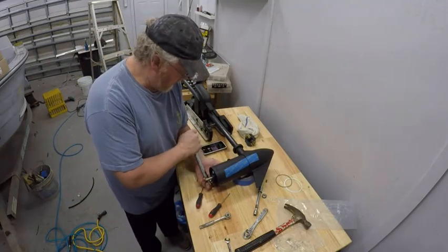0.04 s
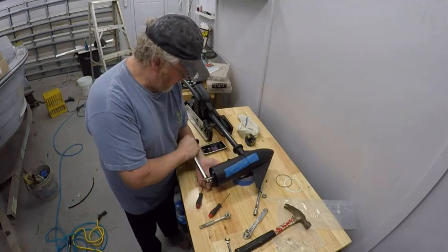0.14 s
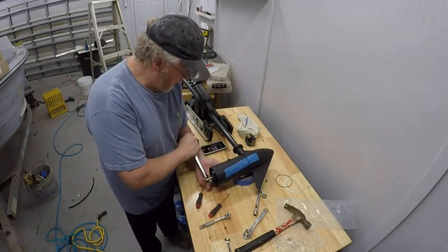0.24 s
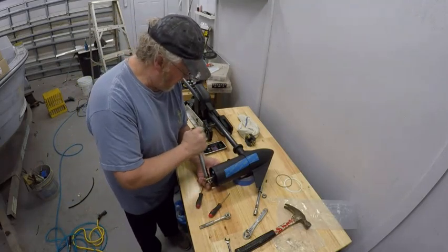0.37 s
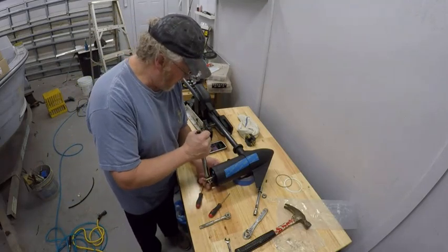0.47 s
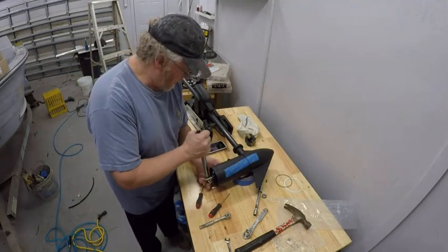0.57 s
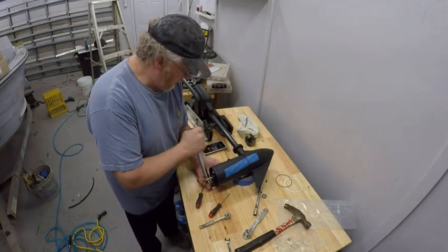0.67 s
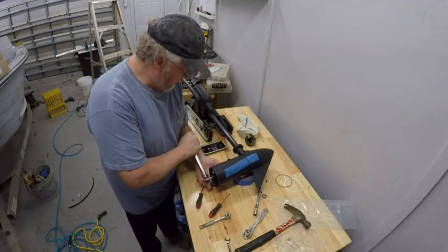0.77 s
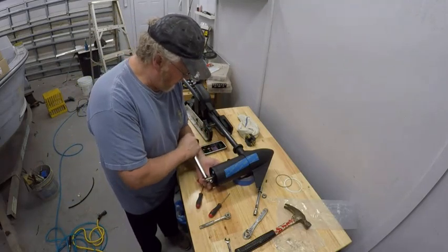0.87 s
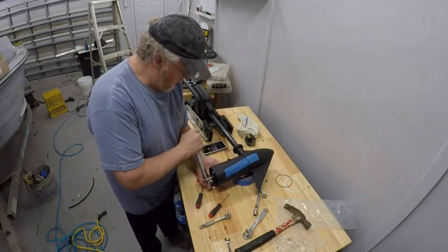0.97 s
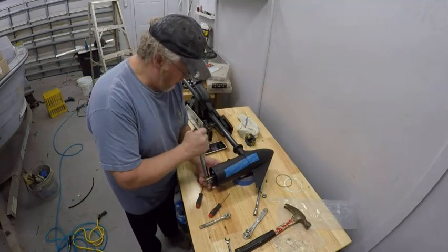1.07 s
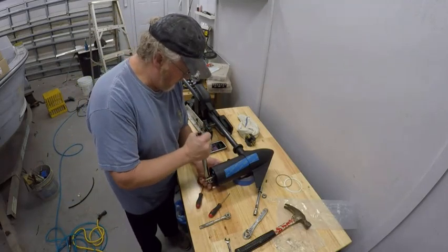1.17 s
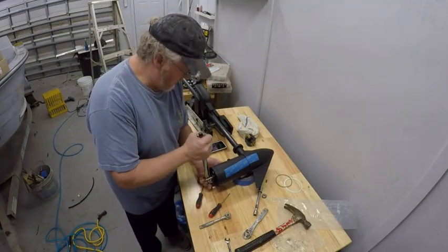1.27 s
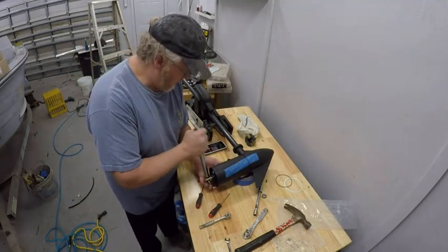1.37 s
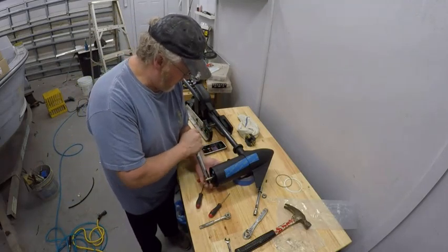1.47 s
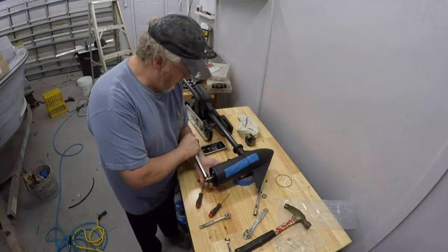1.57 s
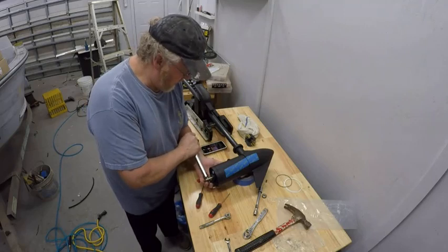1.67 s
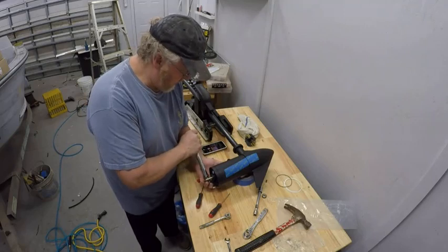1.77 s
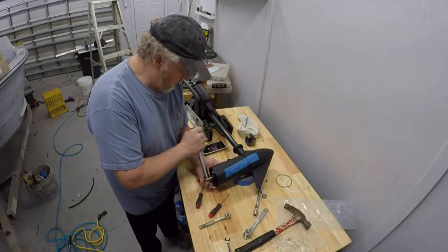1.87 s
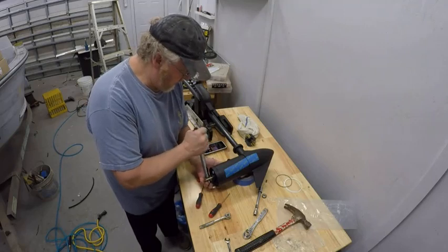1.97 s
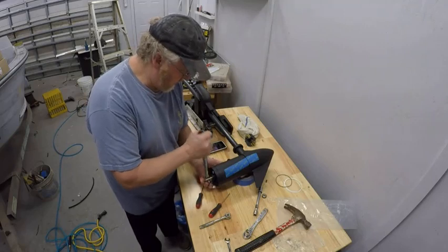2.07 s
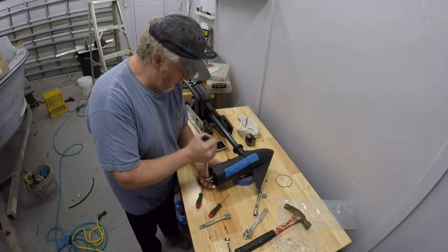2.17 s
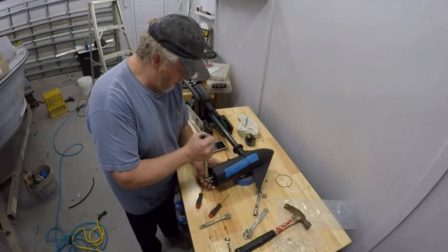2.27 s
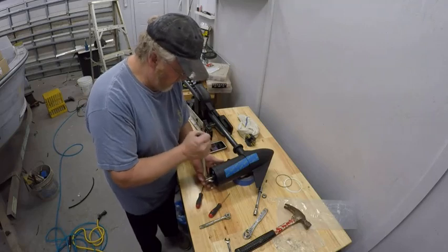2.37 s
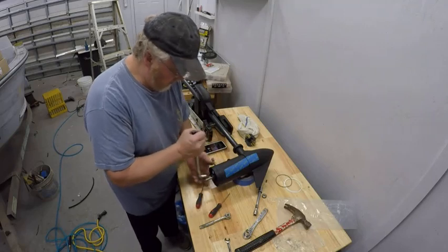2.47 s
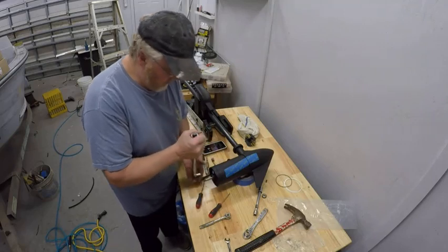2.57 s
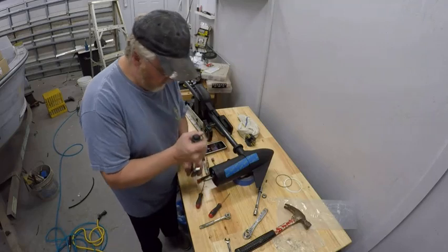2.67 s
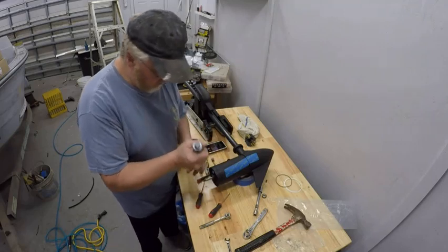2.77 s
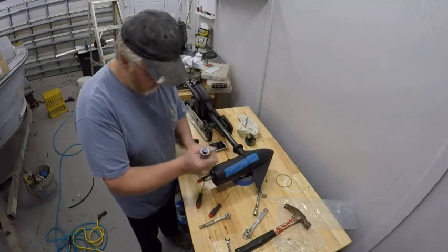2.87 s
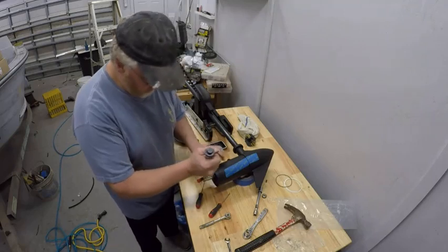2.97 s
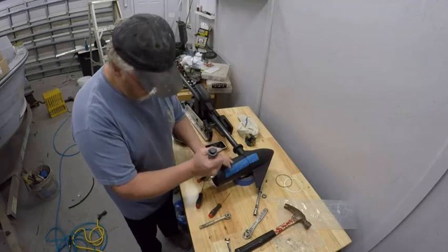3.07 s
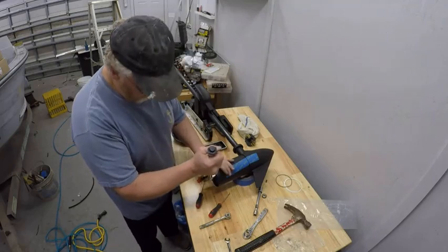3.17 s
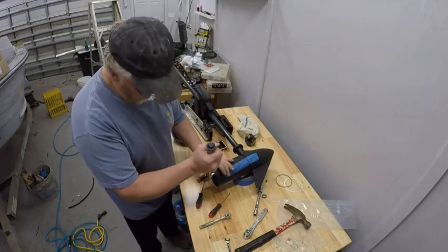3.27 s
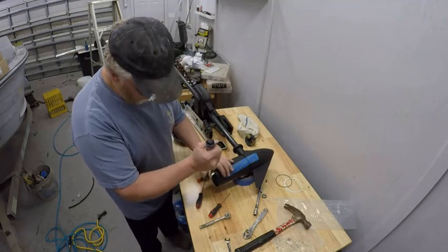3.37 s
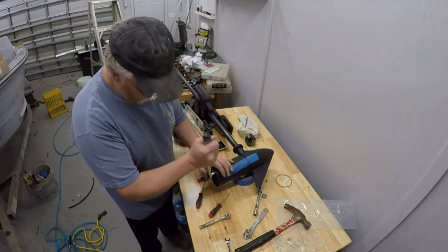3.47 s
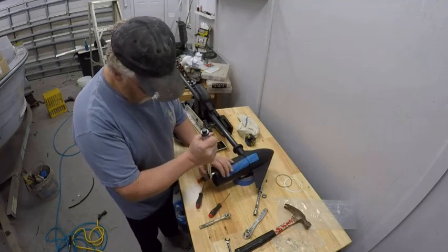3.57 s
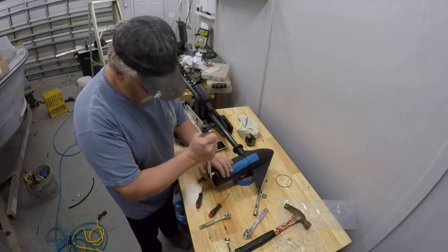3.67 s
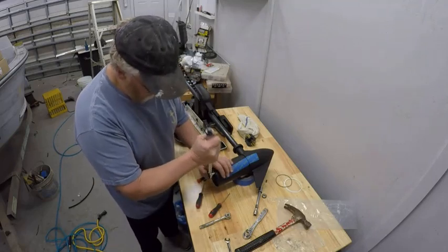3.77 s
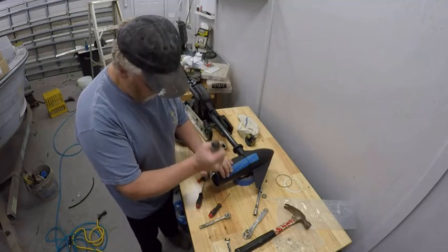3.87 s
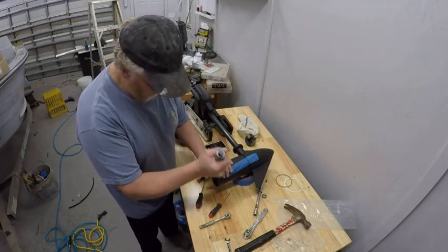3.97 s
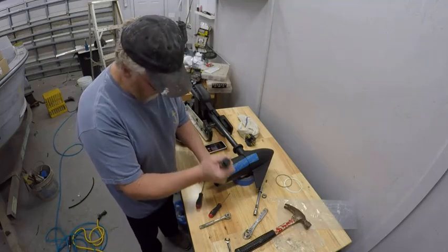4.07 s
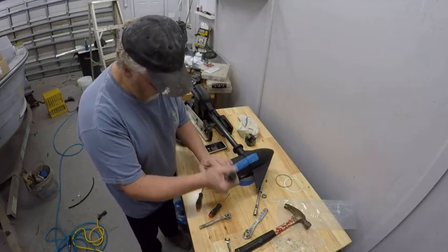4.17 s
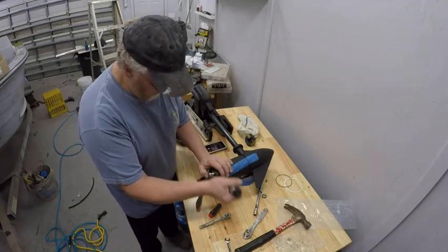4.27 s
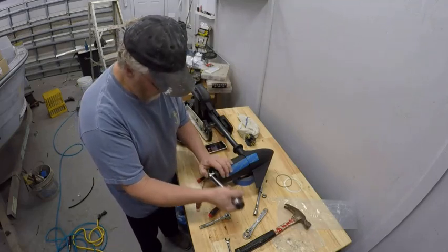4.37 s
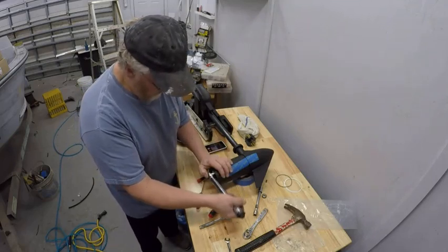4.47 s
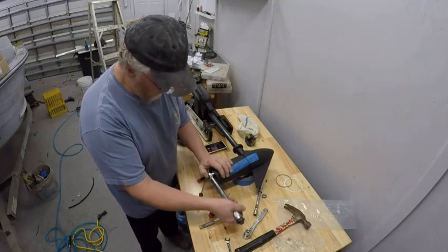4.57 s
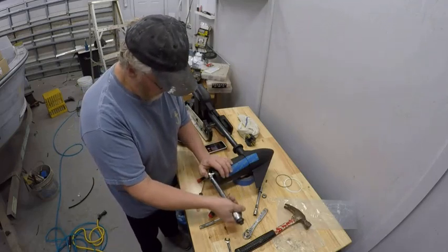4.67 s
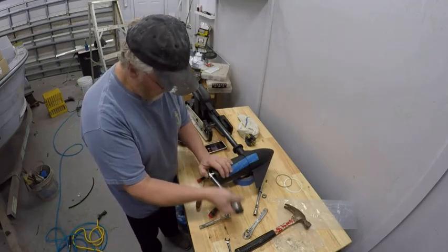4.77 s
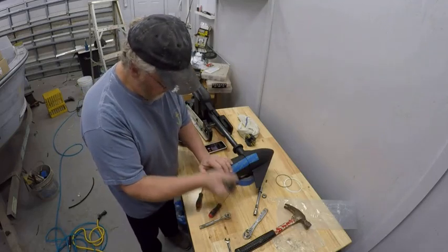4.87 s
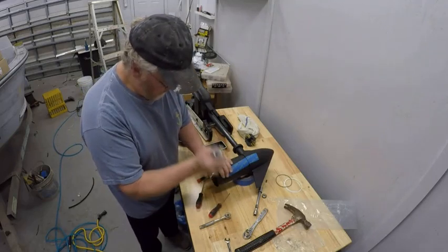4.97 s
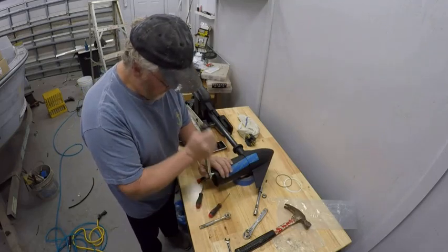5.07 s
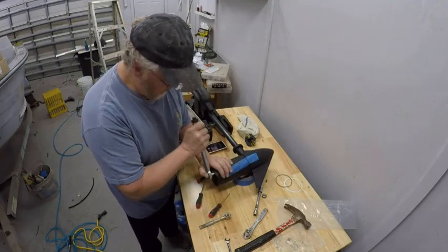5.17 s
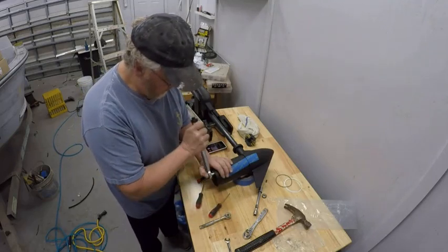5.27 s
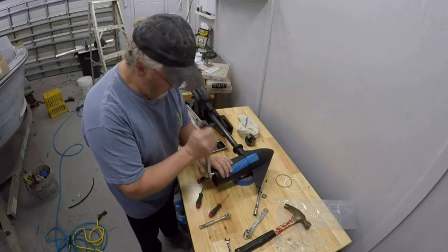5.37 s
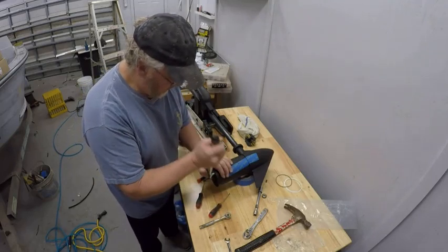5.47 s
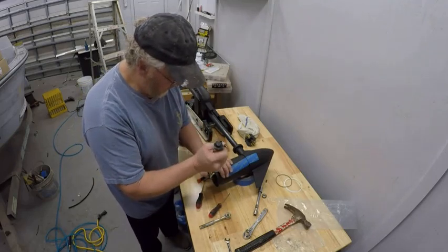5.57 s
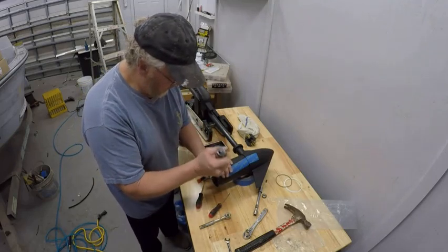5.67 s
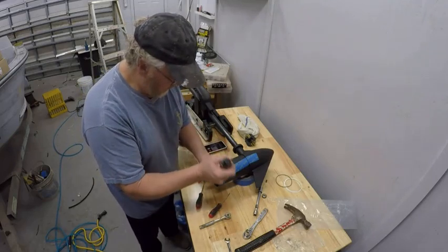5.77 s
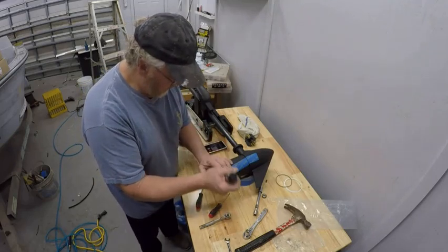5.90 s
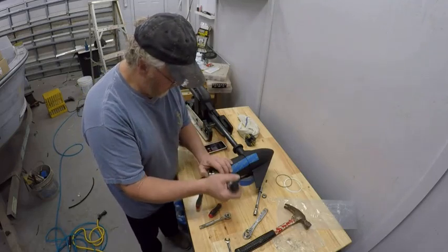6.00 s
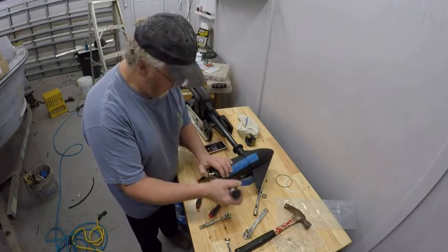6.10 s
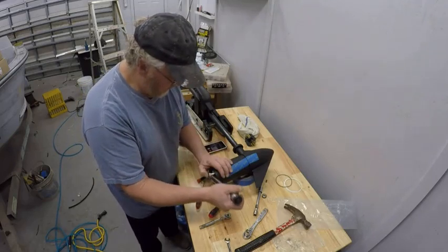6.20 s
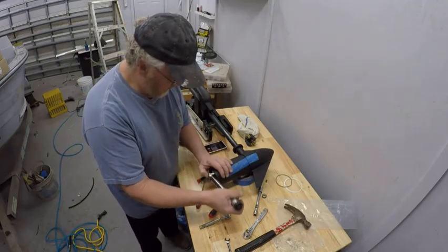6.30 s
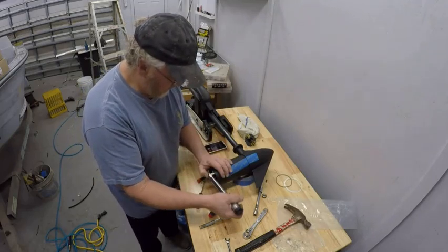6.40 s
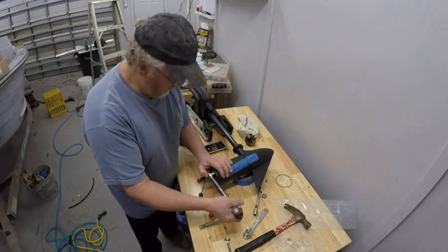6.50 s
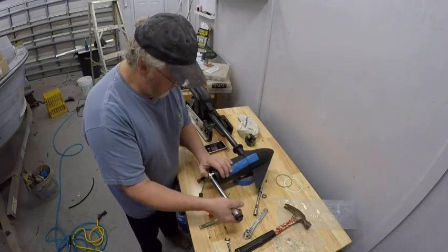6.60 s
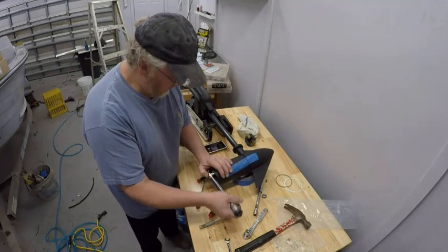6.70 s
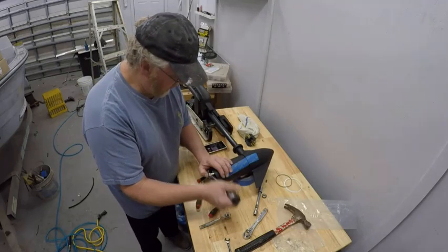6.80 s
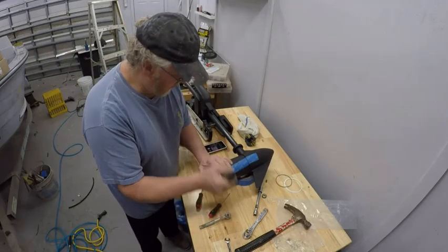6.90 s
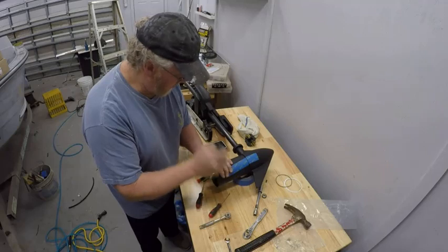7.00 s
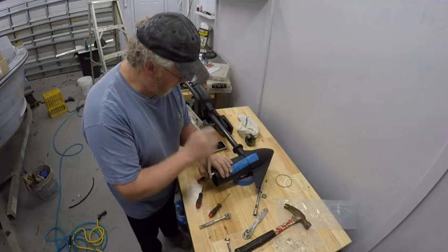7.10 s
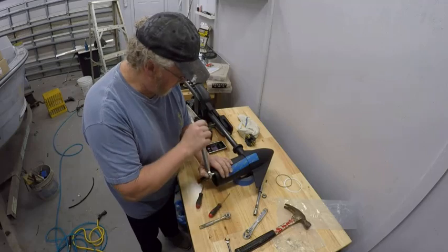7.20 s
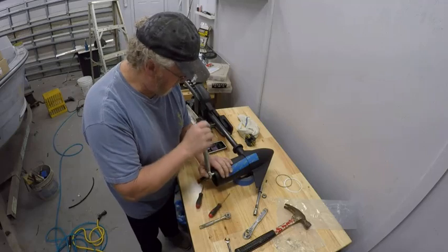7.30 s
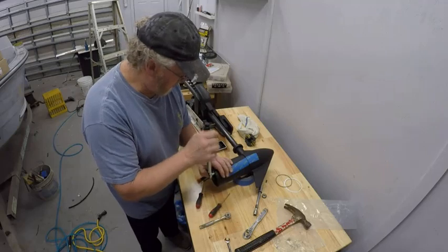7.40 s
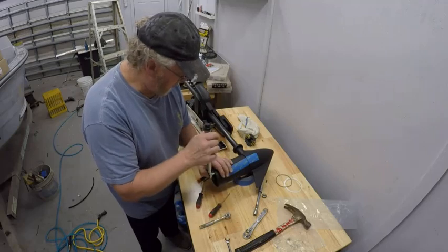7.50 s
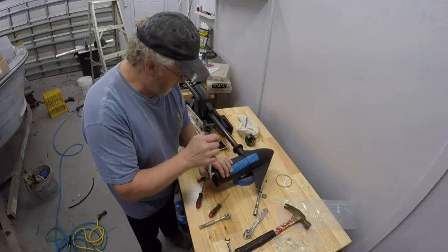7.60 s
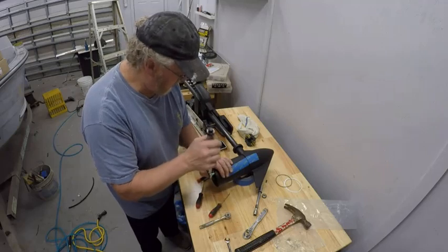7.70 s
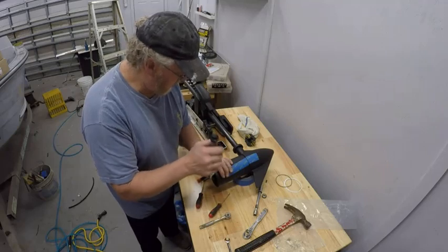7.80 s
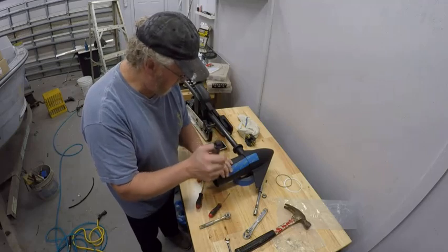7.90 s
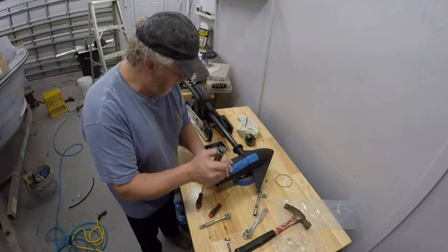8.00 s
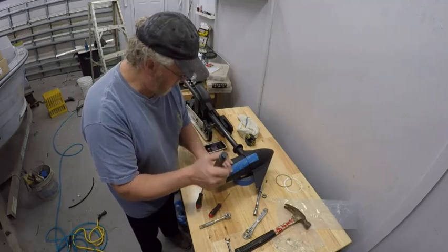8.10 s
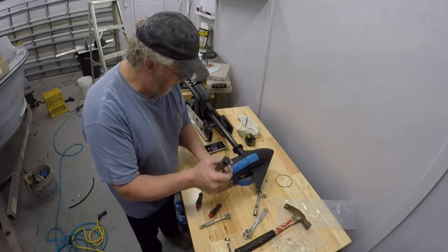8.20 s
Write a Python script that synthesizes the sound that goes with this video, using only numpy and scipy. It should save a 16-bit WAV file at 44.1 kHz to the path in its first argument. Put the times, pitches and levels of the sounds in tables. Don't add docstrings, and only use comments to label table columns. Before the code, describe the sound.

Dry, bright ratchet clicks in irregular groups, each with a tiny steel ring and a quick slap off a nearby wall. Between them come heavier metallic snaps, socket taps and finger contacts on bolts, dull wooden thuds and soft rubbing as a body leans on the bench. The quiet indoor garage has low rumble and steady microphone hiss; the sound is centred, with a short room tail.

```python
import sys
import numpy as np
from scipy import signal
from scipy.fft import rfft, irfft
from scipy.io import wavfile
from scipy.ndimage import uniform_filter1d

SR = 44100
rng = np.random.default_rng(int(sys.argv[2]) if len(sys.argv) > 2 else 0)


def ratio(d):
    e = np.asarray(d, float) / 20
    return 10 ** e


def master_out(mix):
    frames = np.transpose(np.atleast_2d(mix))
    ceiling = np.clip(frames, -1, 1)
    pcm = np.round(ceiling * 32767).astype(np.int16)
    wavfile.write(sys.argv[1], SR, pcm)


N = 363825

# freq_hz, density_db_per_hz
HISS_COLOUR = [(82, -35.5), (140, -5), (260, -11), (430, -19), (1100, -24), (4320, -28.5), (14800, -39),
               (16000, -51)]
HISS_DB = -61.5

# freq_hz, width_hz, level_db
ROOM_MODE_PAIRS = [
    [(24.4, 10, -12), (34.77, 9.7, -2.5)],
    [(51, 8.3, -2.5), (68.2, 6.8, -9.5)],
    [(97.2, 32, 4.5), (123.1, 5.9, 1)],
]
# time_s, rumble_db
BUILDING_LOAD = [(0.0, -34.5), (0.44, -49), (0.5, -26.5), (0.57, -44), (3.51, -45.5), (3.61, -37),
                 (3.81, -49.5), (4.96, -46.5), (5.03, -62.5), (5.14, -35.5), (5.26, -42.5), (5.31, -64),
                 (5.35, -48), (7.42, -46), (7.47, -37), (7.58, -45.5), (8.04, -49.5), (8.25, -44)]
# level_db re load, load_swing_share [0-1]
LOAD_FOLLOW = [(-1, 0.69), (-6.5, .4), (-8, 0.13)]
STEADINESS = 0.32

# freq_hz, t60_s
GARAGE_DECAY = [(500, 1), (1500, 0.37), (3500, 0.48), (9000, 0.36), (15000, 0.46)]

# start_s, length_s, level_db, centre_hz
LEANS = [
    (0.0, 0.17, -63.5, 315),
    (.6, 0.32, -61.5, 190),
    (1.3, 0.34, -64.5, 193),
    (2.4, 0.77, -65, 193),
    (3.95, 0.52, -56.5, 146),
    (.95, 0.354, -47.5, 71),
    (2.15, 0.38, -53, 93.4),
]

# start_s, level_db, boom_db, knock_db, ring_freedom [0-1]
BENCH_THUDS = [
    (1.397, -48, 7, 3, 0.75),
    (2.156, -41, -6.5, -14, 0.34),
    (2.206, -40, -3, 3.5, 0.05),
    (2.229, -38, -5, -13, 0.56),
    (3.246, -50, -4, 1, 0.6),
    (3.543, -43.5, 5, -8, 0.9),
    (3.56, -48, -5, 7, 0.9),
    (3.617, -47.5, 5.5, 2, .9),
    (5.503, -44.5, 2.5, -5, 1),
    (7.453, -42.5, 10, -3.5, 0.95),
]
# freq_hz, level_db, t60_s
BENCH_HUM = [(158.5, 8, 0.13), (192.3, 4.5, 0.12), (219.2, 0, 0.47), (291, -0.5, 0.085),
             (334.7, 0.5, 0.108)]
# freq_hz, level_db, t60_s
BENCH_KNOCK = [(416, -6.5, 0.063), (516, -11, 0.075), (740, -2.5, 0.038), (843, -4.5, 0.017),
               (1096, 3.5, 0.028), (1390, -8.5, 0.023), (1670, -2, 0.016)]
BOOM_HZ, BOOM_T60_S = 69, 0.47

# start_s, level_db, centre_hz, length_ms
DULL_TAPS = [
    (3.246, -50.5, 1610, 7),
    (3.319, -57, 907, 8),
    (3.923, -54.5, 1080, 8.8),
    (5.504, -49, 990, 6),
    (7.452, -52, 1000, 4.5),
]
# start_s, level_db, centre_hz, length_ms
BRIGHT_TAPS = [(0.409, -57, 2150, 16), (0.6596, -55, 3120, 8.7), (1.7688, -56, 2420, 5.9),
               (2.088, -54.5, 3020, 20), (2.453, -44.5, 2380, 18), (2.485, -55, 4000, 9.3),
               (2.6602, -53, 2714, 9.7), (2.7902, -55, 3750, 14), (2.8116, -53, 4270, 15),
               (2.881, -52.5, 2920, 8.7), (5.482, -55, 2440, 6.5), (5.499, -49, 2600, 14),
               (.002, -54, 3850, 48),
    (1.389, -58, 2800, 5.5),
    (2.148, -52, 4000, 7.9),
    (2.799, -64, 8950, 13),
    (3.579, -42, 3500, 6),
    (4.81, -57, 11000, 10),
]

# freq_hz, level_db, t60_s
HOUSING_MODES = [(1906, -3.5, 0.0096), (2220, -2.5, 0.017), (2600, -4, 0.021), (2820, -4.5, 0.012),
                 (3265, -1, 0.021), (3605, -13.5, 0.022), (3870, 10, 0.0057)]
# freq_hz, level_db, t60_s
HEAD_MODES = [(4520, 3.5, 0.0074), (4980, 4.5, 0.0082), (5194, -8, 0.023), (5630, 3, 0.0065),
              (6400, -5, 0.0086), (6750, -7.5, 0.0083)]
# freq_hz, level_db, t60_s
SHAFT_MODES = [(7100, -6, 0.0031), (8040, -7, 0.011), (8130, -2, .008), (8840, -1, 0.015), (9500, -5, 0.01),
               (9700, -3.5, 0.0043)]
# freq_hz, level_db, t60_s
PAWL_MODES = [(11140, -4, .003), (12800, -12, 0.0022), (13200, -2.5, 0.0041), (14130, -3, 0.0031),
              (14960, -1.5, 0.0027)]
SEAT_HZ, SEAT_T60_S, SEAT_DB = 5270, 0.015, -3
SEAT_DB_PER_HOUSING_DB = 1.34

# start_s, head_db, seat_hz, shaft_db re head, wall_echo_db re head
SHORT_TICKS = [
    (0.0984, -39.5, 5400, -8.5, -3),
    (0.158, -41, 4730, -4.5, -6),
    (0.7993, -37, 4780, -12.5, -4),
    (0.8674, -41.5, 6040, -5, -9.5),
    (0.889, -44, 4330, -16, -12),
    (1.5337, -37, 5200, -8.5, -3.5),
    (1.5976, -39.5, 5600, -11.5, 1.5),
]
# housing_db, shaft_db, wall_echo_db
LONG_TICKS = [(4.934, -40, -6, -8.5, -6), (4.9903, -36.5, -14.5, -6, -13), (5.0434, -41.5, -15, -9.5, -3),
              (5.097, -39, -7.5, -7.5, -7), (5.1525, -37, -8, -8.5, -16), (5.2114, -37.5, -15, -18, -20),
              (5.3133, -47.5, -3.5, 0, -12), (6.9735, -36, -10.5, -12, -1.5), (7.0411, -46, -2, -3, -4),
              (7.1019, -39.5, -4, -3.5, -9), (7.1621, -39.5, -5.5, -5, -5.5), (7.222, -37, -11, -5, -11),
              (7.3093, -42.5, -5, -1, -8.5)]
# housing_db, shaft_db, wall_echo_db
SNAPS = [
    (1.3985, -36, 3.5, -5.5, -9),
    (2.1575, -31, -2, -2.5, -10),
    (2.2081, -37, 6.5, -11, -4.5),
    (3.541, -37.5, -3.5, -11.5, 0.5),
    (3.5599, -38, -0.5, -9, -9),
    (3.6168, -38, 6, -25, -5),
]
GRIPPED_HOUSING_DB = -9
TICK_PAWL_DB, SNAP_PAWL_DB = -1, -13
TICK_CRACK_DB, SNAP_CRACK_DB = -4.5, -3.5
CHATTER = 0.45
DETUNE = 0.007
DAMPED = 0.33
REBOUND_S, REBOUND_DB = 3.622, -48
WALL_S = 0.0057
WALL_DB = (-10, 3, 1.5, 4.5)

# freq_hz, chance [0-1]
SWAP_CHANCE = [(4200, 0), (5000, .08), (8000, .12), (12000, 0.2), (15000, 0.2)]


def evened(x):
    return x / np.sqrt(np.mean(x ** 2) + 1e-20)


def peaked(x):
    return x / abs(x).max()


def read(points, hz):
    f, value = np.transpose(points)
    return np.interp(np.log(hz + 1), np.log(f + 1), value)


def add(mix, s, sound):
    part = mix[round(s * SR):][:len(sound)]
    part += sound[:len(part)]


def resonate(x, hz, q):
    b, a = signal.iirpeak(hz, q, SR)
    return signal.lfilter(b, a, signal.lfilter(b, a, x))


def ring(modes, chance, seconds):
    t = np.arange(round(seconds * SR)) / SR
    out = np.zeros(len(t))
    for k, ((hz, db, t60), c) in enumerate(zip(sorted(modes), chance)):
        decay = ratio(db + 2.76 * c - 60 * t / t60)
        out += (-1) ** k * decay * np.sin(2 * np.pi * hz * (1 + DETUNE * c) * t)
    return peaked(out)


def burst(noise, ms):
    t_ms = np.arange(len(noise)) / SR * 1000
    return noise * np.minimum(t_ms / (0.078 * ms), 1) * np.exp(-t_ms / ms)


def hiss():
    colour = ratio(read(HISS_COLOUR, np.fft.rfftfreq(N, 1 / SR)))
    return ratio(HISS_DB) * evened(irfft(rfft(rng.standard_normal(N)) * colour, N))


def rumble():
    hz, t = np.fft.rfftfreq(N, 1 / SR), np.arange(N) / SR
    load_db = np.interp(t, *np.transpose(BUILDING_LOAD))
    mean_db = load_db.mean()
    out = np.zeros(N)
    for modes, (db, share) in zip(ROOM_MODE_PAIRS, LOAD_FOLLOW):
        shape = sum(ratio(mode_db) / (1 + (2 * (hz - f) / width) ** 2) for f, width, mode_db in modes)
        x = irfft(rfft(rng.standard_normal(N)) * shape, N)
        power = abs(uniform_filter1d(x ** 2, size=6000, mode="wrap")) + 1e-20
        x = evened(x / power ** (STEADINESS / 2))
        out += ratio(db + mean_db + share * (load_db - mean_db)) * x
    return out


def garage(x):
    hz, t, z = signal.stft(rng.standard_normal((3, SR // 2)), SR, nperseg=128)
    room = ratio(-60 * t / read(GARAGE_DECAY, hz)[:, None])
    near = 6.3 * ratio(-60 * t / 0.035)
    tails = signal.istft(z * (room + near), SR, nperseg=128)[1]
    tails = tails * np.clip(np.arange(tails.shape[1]) / SR / 0.0031 - 1.2, 0, 1)
    turn = 2 * np.pi * (np.arange(N) / SR * 5.3 + np.arange(3)[:, None] / 3)
    fed = x * np.sqrt(2 / 3) * np.cos(turn)
    return signal.fftconvolve(fed, tails / np.linalg.norm(tails[0]), axes=1)[:, :N].sum(0)


def leaning():
    out = np.zeros(N)
    for s, length_s, db, hz in LEANS:
        b, a = signal.iirpeak(hz, 2.5, SR)
        rub = signal.lfilter(b, a, signal.lfilter(b, a, rng.standard_normal(SR)))
        rub = evened(rub)[:round(length_s * SR)]
        add(out, s, ratio(db) * rub * np.sqrt(np.hanning(len(rub))))
    return out


def bench():
    out, t = np.zeros(N), np.arange(SR // 2) / SR
    for s, db, boom_db, knock_db, free in BENCH_THUDS:
        chance = rng.standard_normal(12)
        boom = ratio(boom_db - 60 * t / BOOM_T60_S) * np.sin(2 * np.pi * BOOM_HZ * t)
        boom *= np.minimum(t / 0.0077, 1)
        top = [(hz, mode_db, free * t60) for hz, mode_db, t60 in BENCH_HUM]
        hum = ring(top, chance, seconds=0.5) * np.minimum(t / 0.013, 1)
        knock = ratio(knock_db) * ring(BENCH_KNOCK, chance[5:], seconds=0.5)
        add(out, s, ratio(db) * (hum + boom + knock))
    return out


def socket():
    out = np.zeros(N)
    for s, db, hz, ms in DULL_TAPS + BRIGHT_TAPS:
        tap = resonate(burst(rng.standard_normal(3000), ms), hz, q=0.7)
        add(out, s - 0.001, ratio(db) * peaked(tap))
    return out


def click(out, s, db, housing_db, shaft_db, echo_db, seat_hz, pawl_db, crack_db):
    near, far = rng.standard_normal((2, 940))
    chatter = burst(near[40:], ms=0.44) + 0.26 * burst(near[40:], ms=6.4)
    crack = CHATTER * chatter / np.linalg.norm(chatter)
    crack[10] += 1
    smear = burst(far[40:], ms=3.5)
    bare = resonate(burst(far[40:], ms=4.3), 4500, q=0.6)
    bare = ratio(db + max(housing_db, 0) + crack_db) * peaked(bare)
    add(out.T, s - 0.0004, bare[:, None])

    wall_s = s + WALL_S + 0.0005 * far[0]
    head = HEAD_MODES + [(seat_hz, SEAT_DB - SEAT_DB_PER_HOUSING_DB * housing_db, SEAT_T60_S)]
    parts = ((head, 0), (HOUSING_MODES, housing_db), (SHAFT_MODES, shaft_db), (PAWL_MODES, shaft_db + pawl_db))
    for k, (modes, part_db) in enumerate(parts):
        chance = near[10 * k:]
        steel, energy = ring(modes, chance, seconds=0.03), 0
        for start, blow, path_db in ((s, crack, 0), (wall_s, smear, echo_db + WALL_DB[k])):
            sound = ratio(db + part_db + path_db) * peaked(signal.fftconvolve(blow, steel))
            add(out[0], start - 0.0004, sound)
            energy += sound @ sound
        damped = [(hz, mode_db, DAMPED * t60) for hz, mode_db, t60 in modes]
        blur = ring(damped, chance, seconds=0.03)
        add(out[1], s, blur * np.sqrt(energy / (blur @ blur)))


def wrench():
    out = np.zeros((2, N))
    for s, db, seat_hz, shaft_db, echo_db in SHORT_TICKS:
        click(out, s, db, GRIPPED_HOUSING_DB, shaft_db, echo_db, seat_hz, TICK_PAWL_DB, TICK_CRACK_DB)
    for row in LONG_TICKS:
        click(out, *row, SEAT_HZ, TICK_PAWL_DB, TICK_CRACK_DB)
    for row in SNAPS:
        click(out, *row, SEAT_HZ, SNAP_PAWL_DB, SNAP_CRACK_DB)
    pawl = ring(PAWL_MODES[2:4], np.zeros(2), seconds=0.03)
    jump = signal.fftconvolve(burst(rng.standard_normal(900), ms=3.0), pawl)
    add(out.T, REBOUND_S, (ratio(REBOUND_DB) * peaked(jump))[:, None])
    return out


def scene():
    steel, spread = wrench()
    taps, wood = socket(), bench()
    room = ratio(-2.5) * garage(spread + taps + 0.5 * wood)
    mono = hiss() + rumble() + room + leaning() + wood + taps + steel
    return np.array([mono, mono])


def swap_for_noise(mono):
    hz, t, z = signal.stft(mono, SR, nperseg=512)
    band = (hz // 900).astype(int)
    dice = rng.random((len(t) // 4 + 1, band.max() + 1))
    dice = np.minimum(dice, np.roll(dice, 1, axis=0)) * 1.8
    swap = np.repeat(dice, 4, axis=0)[:len(t), band].T < read(SWAP_CHANCE, hz)[:, None]
    level = np.sqrt(abs(uniform_filter1d(abs(z) ** 2, size=9, axis=0)))
    noise = signal.stft(rng.standard_normal((2, N)), SR, nperseg=512)[2]
    noise *= level / np.sqrt(np.mean(abs(noise) ** 2))
    return signal.istft(np.where(swap, noise, z), SR, nperseg=512)[1][:, :N]


def top_cut(x):
    return signal.sosfilt(signal.butter(12, 16450, fs=SR, output="sos"), x)


def record(dry):
    edge = signal.firwin(401, 15300, window=("kaiser", 8), fs=SR)
    low = signal.oaconvolve(dry[0], edge, "same")
    top = dry[0] - low
    is_loud = uniform_filter1d(top ** 2, size=128) > ratio(-72.0) ** 2
    gate = uniform_filter1d(1.0 * is_loud, size=128)
    x = swap_for_noise(low + ratio(-17.0) * top * gate)
    x = x + ratio(-104.0) * rng.standard_normal(x.shape)
    return top_cut(x)


dry = scene()
out = record(dry)
master_out(out)
```